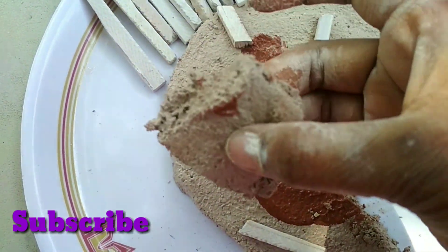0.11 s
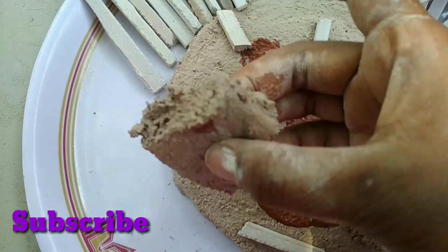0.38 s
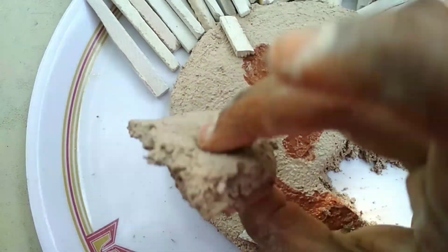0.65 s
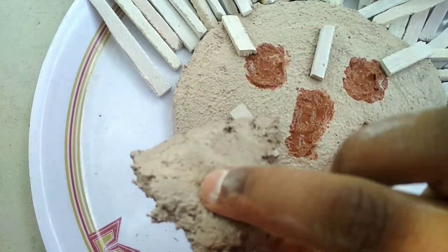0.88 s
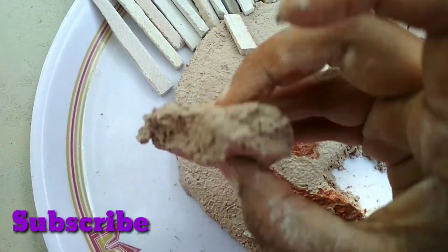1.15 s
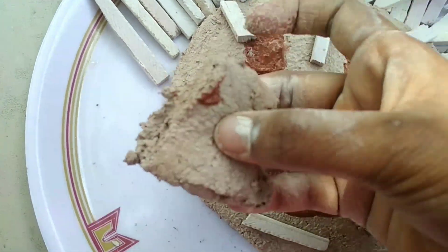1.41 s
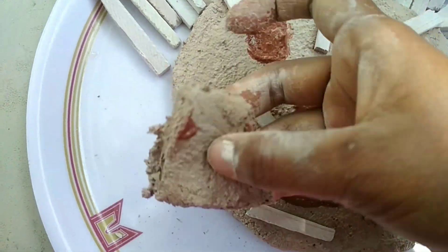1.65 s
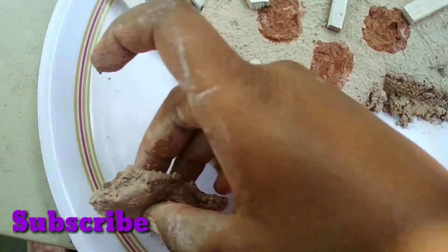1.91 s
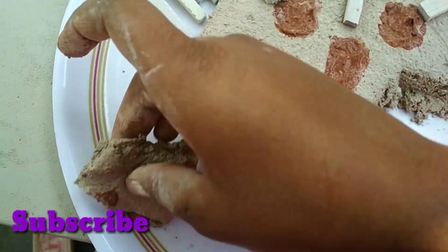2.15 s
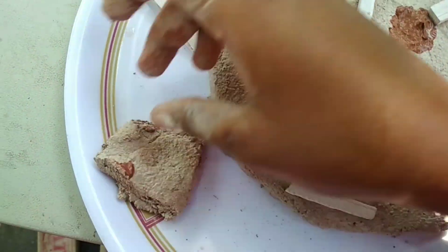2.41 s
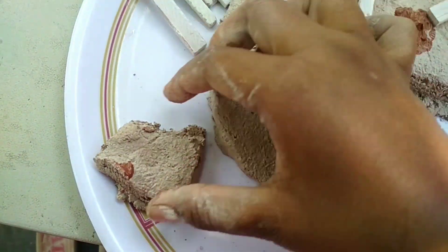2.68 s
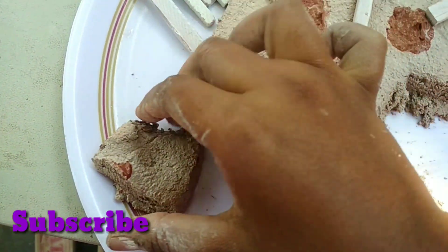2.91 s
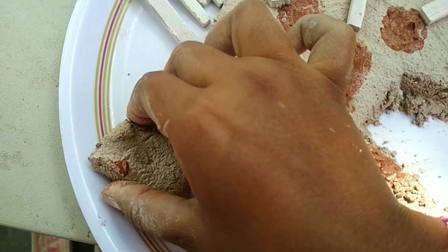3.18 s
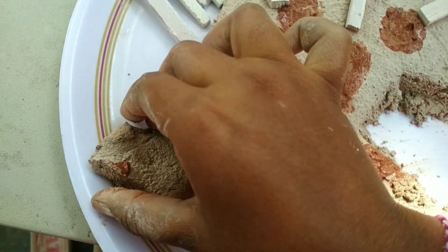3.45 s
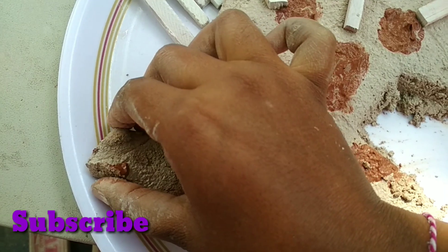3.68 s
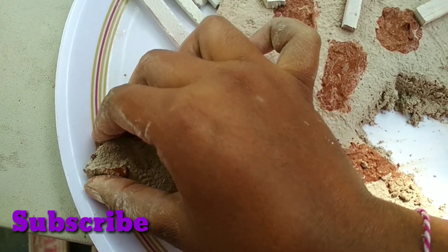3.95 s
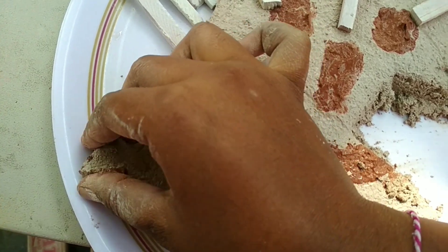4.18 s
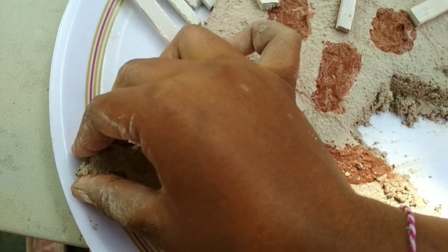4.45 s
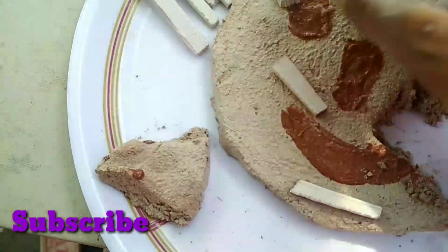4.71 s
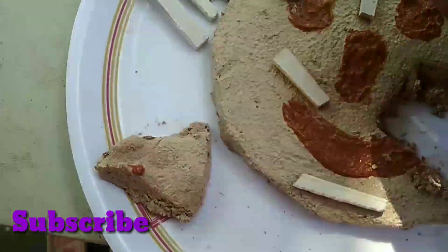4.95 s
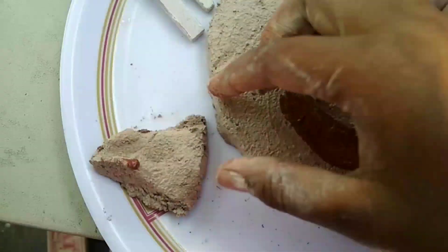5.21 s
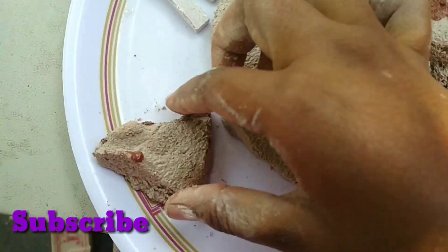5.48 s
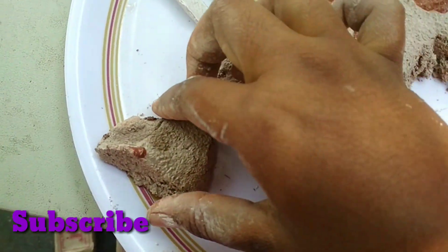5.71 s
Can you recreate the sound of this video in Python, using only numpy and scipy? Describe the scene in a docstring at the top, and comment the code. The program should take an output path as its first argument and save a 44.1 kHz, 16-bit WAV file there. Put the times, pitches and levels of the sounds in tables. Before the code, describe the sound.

A close stereo phone pickup in a quiet room with low rumble and faint smeared noise patches. Thin, wavering whines linger very faintly at the start, mostly gone by 0.6 s. Fingers rub a damp cake of pressed powder: a gritty squeeze at 0.3 s, a sharp bright snap with a crunch and small plate knock at 0.7 s, and another crackling squeeze around 1.2-1.3 s. A softer crunch comes at 2.1 s, then small crumb ticks until 2.4 s. Faint treble rubbing continues; one lump knocks the plastic plate at 3.1 s. From 3.8 to 4.6 s, tiny ticks lean left. A soft low nudge and dull drag at 4.9 s lead into the loudest moment: lumps clattering hollowly from 5.0 to 5.3 s, weakening until 5.6 s, with crackles, pattering debris and sliding powder. A faint tick and squeeze end it near 5.75 s.

```python
"""Fingers handle and crumble a damp cake of pressed powder over a plastic plate, close to a stereo phone.
From the start: low room rumble, faint smeared noise patches, whining tones (most gone within 0.6 s, one
faint low one lasting to 2 s), and grains rubbing as treble noise. From 0.2 s crumbs tick (noise bursts) and
squeezes crunch (duller noise). Single lumps ring the plate's modes at 0.7 and 3.1 s; a soft nudge at 4.9 s
leads into a run of lumps to 5.6 s, with pattering debris and sliding powder; a last faint squeeze ends it."""
import sys
import numpy as np
from scipy import signal
from scipy.fft import rfft, irfft
from scipy.io import wavfile

SR = 44100
rng = np.random.default_rng(int(sys.argv[2]) if len(sys.argv) > 2 else 0)


def store_pcm(level_fs):
    """Save levels as 16-bit WAV."""
    pcm = np.round(np.clip(level_fs, -1, 1) * 32767).astype(np.int16)
    wavfile.write(sys.argv[1], SR, np.atleast_2d(pcm).T)


N = 257879


def from_db(db):
    """Decibels to gain."""
    return 10 ** (np.asarray(db) / 20)


def rms_one(x):
    """Scale to unit rms."""
    return x / np.sqrt(np.mean(x ** 2) + 1e-20)


def noise_of(*shape):
    """White Gaussian noise."""
    return rng.standard_normal(shape)


def at_hz(points, hz):
    """Read a spectrum on a log-frequency axis."""
    point_hz, value = np.transpose(points)
    return np.interp(np.log(hz), np.log(point_hz), value)


def colour(x, spectrum):
    """Shape the last axis to a spectrum given in dB."""
    hz = np.maximum(np.arange(N // 2 + 1) * SR / N, 1)
    return irfft(rfft(x) * from_db(at_hz(spectrum, hz)), N)


def butter(x, order, edges_hz, kind):
    """Causal Butterworth filter."""
    return signal.sosfilt(signal.butter(order, edges_hz, kind, fs=SR, output="sos"), x)


def band(x, low_hz, high_hz):
    """Causal band-pass."""
    return butter(x + 1e-18, 2, [low_hz, min(high_hz, 0.45 * SR)], "band")


def in_time(rows):
    """Read a (t/s, value) curve at every sample."""
    return np.interp(np.arange(N) / SR, *np.transpose(rows))


def drift(rate_hz):
    """Random curve about 0: unit-normal knots, two per 1 / rate_hz, joined by straight lines."""
    return in_time(np.c_[np.arange(4000) / (2 * rate_hz), noise_of(4000)])


def sides(pan_db):
    """Left and right gains."""
    return from_db(np.array([pan_db / 2, -pan_db / 2]))


def dying(s, db, t60_s):
    """Envelope that jumps at every event and dies away exponentially."""
    env = np.zeros(N)
    for start_s, level_db, fall_s in zip(s, db, np.broadcast_to(t60_s, len(s))):
        i = round(start_s * SR)
        t = np.arange(min(N - i, int(abs(fall_s) * SR) + 9)) / SR
        env[i:i + len(t)] += from_db(level_db - 60 * t / abs(fall_s))
    return env


def swells(s, db, rise_s, fall_s, bend):
    """Climbs 20 dB in rise_s to each peak, drops 20 dB in fall_s; bend 1 = straight in dB, more = rounder."""
    t, env = np.arange(N) / SR, np.zeros(N)
    for peak_s, level_db, up_s, down_s in np.broadcast(s, db, np.abs(rise_s), np.abs(fall_s)):
        near = slice(max(int((peak_s - 4 * up_s) * SR), 0), int((peak_s + 4 * down_s) * SR))
        away = np.maximum((peak_s - t[near]) / up_s, (t[near] - peak_s) / down_s)
        env[near] += from_db(level_db - 20 * away ** bend)
    return env


def streaky(x, low_hz, high_hz, streak_db, rate_hz, count):
    """Split into narrow bands that each swell and sink on their own; unit rms."""
    edges = np.geomspace(low_hz, high_hz, count + 1)
    return rms_one(sum(band(x, a, b) * from_db(streak_db * drift(rate_hz)) for a, b in zip(edges, edges[1:])))


def uneven_grains(spread_db):
    """Noise with grains of uneven size, independent noise in each channel."""
    return noise_of(2, N) * from_db(spread_db * np.minimum(rng.exponential(1, N), 5))


# room noise spectrum, relative: f/Hz, level/dB
ROOM_SPECTRUM = [(12, -45.5), (20, -8), (85, 2), (238, -6), (388, -12), (649, -30), (985, -41.5),
                 (2560, -48.5), (3270, -42.5), (3980, -49), (7000, -52.5), (9100, -91), (15400, -120)]
# left-right likeness of the room noise: f/Hz, correlation [-1..1]
ROOM_LIKENESS = [(60, 0.82), (180, 0.86), (550, 0.54), (1650, -0.0), (4970, 0.0), (15000, 0.28)]


def rumble(patchy_db):
    """Quarter-octave bands of room noise, each with its own flicker and left-right likeness."""
    level_db = -61
    out, edges = 0, 20 * 2 ** np.arange(0, 9.1, 0.25)
    white = colour(noise_of(2, 2, N), ROOM_SPECTRUM)
    for k, (low_hz, high_hz) in enumerate(zip(edges, edges[1:])):
        mid, side = band(white[k % 2], low_hz, high_hz)
        alike = np.clip(at_hz(ROOM_LIKENESS, np.sqrt(low_hz * high_hz)), -1, 1)
        flicker_db = patchy_db * np.clip(np.log2(high_hz / 200), 0.3, 2.2) * drift(5)
        stereo = np.sqrt(1 + alike) * mid + np.sqrt(1 - alike) * side * [[1], [-1]]
        out = out + from_db(flicker_db) * stereo
    return from_db(level_db) * rms_one(out)


# faint smeared patches with no clear source: t/s, length/s, f/Hz, width/Hz, level/dB
SMEARS = [(.0, 0.32, 1420, 197, -73.5), (0.462, 0.3, 6770, 1200, -72.5), (0.993, 0.71, 1320, 278, -82),
          (1.748, 0.19, 6170, 730, -75), (1.787, 0.26, 4390, 1210, -71.5), (2.399, 0.28, 2280, 217, -71.5),
          (2.394, 0.25, 4410, 493, -77.5), (2.524, 0.23, 7970, 300, -67.5), (2.545, 0.23, 6900, 590, -68.5),
          (3.181, 0.25, 6600, 504, -68), (3.245, 0.2, 3350, 890, -75.5), (3.4, 0.47, 479, 29.6, -73),
          (3.772, 0.14, 873, 49.3, -72.5), (3.923, 0.15, 6350, 397, -76.5), (3.978, 0.18, 4430, 790, -72.5),
          (3.986, 0.38, 694, 80.4, -76), (4.077, 0.16, 1760, 202, -81.5), (2.597, 0.59, 1430, 615, -83),
          (0, .2, 2180, 496, -80.5), (4.306, 0.48, 1766, 143, -78), (5.734, 0.17, 6850, 700, -71)]


def patches():
    """Each patch is narrow noise that swells quickly and fades slowly."""
    out = np.zeros((2, N))
    for s, length_s, hz, width_hz, db in SMEARS:
        i, noise = max(round(s * SR), 0), noise_of(2, SR)
        n = min(int(length_s * SR), N - i, SR)
        env = np.interp(np.linspace(0, 1, n), [0, 0.2, 0.6, 1], [0.049, 0.99, 0.54, 0.049])
        narrow = band(noise, hz - width_hz / 2, hz + width_hz / 2)
        narrow = band(narrow, hz - width_hz, hz + width_hz)
        settled = rms_one(narrow)[:, SR - n:]
        out[:, i:i + n] += from_db(db) * env * settled * sides(-3.5)[:, None]
    return out


# whining tones: f/Hz, level/dB, start/s, end/s
WHINE_TONES = [(516, -84.5, 0.078, 2.02), (757, -75, 0.02, 0.29), (1516, -74.5, 0.016, 0.29),
               (2265, -86, 0, 0.26), (764, -74.5, 0.284, 0.49), (1530, -78, 0.266, 0.49),
               (1806, -87.5, 0.21, 0.574)]


def whine():
    """Thin rough tones that waver, break up and fade out."""
    t, out = np.arange(N) / SR, 0
    for hz, db, start_s, end_s in WHINE_TONES:
        phase = 2 * np.pi * hz * np.cumsum(1 + 0.0043 * drift(25)) / SR
        gain = from_db(db + 4.5 + 5.3 * drift(8.33) + 2.4 * drift(40))
        fade = np.clip(np.minimum((t - start_s + 0.046) / 0.028, (end_s - t) / 0.22), 0, 1)
        out = out + gain * np.sin(phase) * fade
    return out


# squeezes of the cake: t/s, grain level/dB, rise/s, fall/s, dull crunch re grain/dB
CAKE_SQUEEZES = [(0.222, -69, 0.0065, 0.076, -43), (0.303, -46.5, 0.035, 0.11, -12.5),
                 (0.682, -38.5, 0.0049, 0.12, -11.5), (0.793, -46.5, 0.011, 0.16, -12),
                 (1.18, -53, .02, 0.075, -11.5), (1.256, -40, 0.0097, 0.2, -19),
                 (2.058, -44, 0.0082, 0.14, -8.5), (4.83, -54, 0.091, 0.26, -10),
                 (5.753, -68.5, 0.014, 0.19, -40)]
# rounder swells of grain hiss without crunch, light touches and the held parts of squeezes:
# t/s, grain level/dB, half length/s
ROUND_SWELLS = [(0.0, -75, 0.13), (0.132, -75.5, 0.073), (.58, -64, 0.25), (0.66, -70, 0.07),
                (0.902, -52, 0.15), (1.148, -63, 0.017), (1.249, -68, 0.07), (1.324, -46.5, 0.057),
                (1.547, -75.5, 0.23), (1.702, -60, 0.092), (1.892, -61.5, 0.097), (2.001, -56, 0.092),
                (2.234, -58.5, 0.1), (2.346, -60, 0.17), (2.636, -59, 0.084), (2.799, -64, 0.083),
                (3.007, -96, 0.023), (3.083, -64, 0.044), (3.22, -65.5, 0.2), (3.357, -62, 0.053),
                (3.524, -71.5, 0.029), (3.642, -63.5, 0.059), (3.782, -67.5, 0.029), (3.849, -70, 0.034),
                (3.975, -72.5, 0.017), (4.068, -62.5, 0.039), (4.192, -69, 0.034), (4.273, -66, 0.04),
                (4.424, -70, 0.012), (4.543, -67, 0.6), (4.631, -58, 0.017), (5.003, -92, 0.047),
                (5.177, -50.5, 0.057), (5.353, -62.5, 0.23), (5.576, -80, 0.14)]
SQUEEZE_BEND = 1.11


def grip():
    """Drive of the grain hiss in dB: squeezes and rounder swells over the resting hand."""
    rest_db, round_bend = -99.5, 1.32
    s, db, rise_s, fall_s, _ = np.transpose(CAKE_SQUEEZES)
    round_s, round_db, half_s = np.transpose(ROUND_SWELLS)
    squeezes = swells(s, db, rise_s, fall_s, SQUEEZE_BEND)
    rounder = swells(round_s, round_db, half_s, half_s, round_bend)
    return 20 * np.log10(from_db(rest_db) + squeezes + rounder)


# spectrum of the strong hiss, relative: f/Hz, level/dB
GRAIN_SPECTRUM = [(3530, -43), (6000, -22.5), (7540, -29), (7970, -19.5), (9840, -8.5), (11700, -3),
                  (14800, -6.5), (15900, 2.5), (16500, -77.5)]
# where the fingers work: t/s, left-right level/dB
HAND_PAN = [(0.0, -14), (0.29, 1), (2.51, -0.5), (3.84, -18), (4.92, 6.5), (5.85, -3.5)]


def rubbing(spread_db, clump_db):
    """Dense grains of uneven size come in clumps; each microphone hears a different mix of them."""
    hiss_db = grip()
    effort = np.clip((hiss_db + 77.5) / 30, 0, 1)      # strong hiss is lumpier than faint hiss
    strong = colour(uneven_grains(spread_db), GRAIN_SPECTRUM)
    strong = streaky(strong, 5000, 16500, streak_db=2.5, rate_hz=8.6, count=30)
    clumps = from_db(clump_db * effort * drift(120) + 0.4 * drift(23))
    faint = colour(noise_of(2, N), [(9000, 0.00099), (16000, 0.5)])
    faint = rms_one(butter(faint, 5, [9670, 15400], "band"))      # thin and even
    grains = effort * strong + (1 - effort) * faint
    return from_db(hiss_db + 3.0) * grains * clumps * sides(in_time(HAND_PAN))


# crumbs snapping: t/s, level/dB, left-right level/dB
CRUMB_TICKS = [(0.2215, -54, -34), (0.6852, -20, 7), (1.178, -40, 7), (1.25, -24.5, 2.5), (1.281, -27, -8),
               (2.2232, -35, -4), (2.3125, -39, -17), (2.3504, -39, -13), (2.38, -37.5, -13.5),
               (3.7845, -60.5, -29), (3.9652, -50, -31), (4.1842, -53, -7), (4.1976, -47, -30),
               (4.2335, -35, 4), (4.327, -49.5, -30), (4.4003, -58, -13), (4.4109, -47, -14),
               (4.4284, -36.5, -22), (4.5101, -45, -18.5), (4.5247, -44, -29), (4.6097, -48, -26),
               (4.636, -56, -19), (4.6406, -48, -22), (5.2461, -38, -1), (5.5247, -35.5, -4),
               (5.7453, -40.5, -5)]


def ticks():
    """A crumb snaps: a few milliseconds of bright noise."""
    s, db, pan_db = np.transpose(CRUMB_TICKS)
    env = np.array([dying(s, db + side * pan_db / 2 + 3, 0.0065) for side in (1, -1)])
    bright = band(band(env * noise_of(2, N), 10580, 13000), 7500, 17000)
    dull = band(env * noise_of(2, N), 3000, 7300)
    return bright + from_db(-32) * dull


# spectrum of the yielding mass, relative: f/Hz, level/dB
MASS_SPECTRUM = [(290, -44), (500, -0.5), (969, -5.5), (1250, -7), (2690, -11.5), (4080, -17.5),
                 (8000, -14.5), (10400, -49.5), (17600, -120)]


def crunches(clump_db):
    """The damp mass yields to each squeeze with a dull grainy noise, and slides on, duller, after each lump."""
    lag_s, extra_rise_s, stretch = 0.014, 0.014, 1.087      # the mass yields after the skin grips
    slide_db, slide_follows, slide_t60_s = -65, 0.66, 0.38
    yield_tilt_db, slide_tilt_db = 3, -7      # per octave from 1 to 8 kHz
    grains = colour(uneven_grains(2.3), MASS_SPECTRUM)
    grains = streaky(grains, 398, 8960, streak_db=2.5, rate_hz=10, count=32)
    s, db, rise_s, fall_s, crunch_db = np.transpose(CAKE_SQUEEZES)
    yielding = swells(s + lag_s, db + crunch_db, rise_s + extra_rise_s, stretch * fall_s, SQUEEZE_BEND)
    lump_s, lump_db = np.transpose(LUMP_KNOCKS)[:2]
    sliding = dying(lump_s, slide_db + slide_follows * (lump_db + 28), slide_t60_s)
    out = 0
    for env, tilt_db in ((yielding, yield_tilt_db), (sliding, slide_tilt_db)):
        out = out + env * rms_one(colour(grains, [(1000, 0), (8000, np.log2(8) * tilt_db)]))
    return out * from_db(clump_db * drift(60))


# lumps on the plate: t/s, level/dB, thump re level/dB, crack re level/dB, sparkle re level/dB
LUMP_KNOCKS = [(0.68, -37, -20.5, -49, 1), (3.08, -31.5, -9, -3.5, -4.5), (3.089, -34, -3, -27.5, -38),
               (4.897, -45.5, -8, -18, -17), (4.992, -16.5, -15, -16, -19), (5.003, -23.5, -12, -43, -49.5),
               (5.079, -23, -14, -7.5, -8), (5.129, -31.5, -2.5, -1, -7.5), (5.16, -16, -15, -9.5, -1.5),
               (5.175, -27, -5.5, -9.5, -23.5), (5.222, -28, -25, -26, -22), (5.28, -19.5, -19, -12.5, -17),
               (5.286, -21.5, -12, -6.5, -13.5), (5.393, -26.5, -17.5, -22, -27),
               (5.439, -43, -6.5, -13.5, -38), (5.467, -47, -4, -20, -42), (5.5, -47, -15, -26, -38),
               (5.516, -55, -14, -32.5, -38), (5.549, -44.5, -16, -39, -44), (5.59, -49.5, -3, -49, -41)]
# plate modes: f/Hz, level/dB, t60/s
PLATE_MODES = [(241, -13.5, 0.071), (294, -9.5, 0.19), (361.3, -1.5, 0.088), (412, -5, 0.077),
               (462, -10.5, 0.022), (499.5, -10.5, 0.076), (659, -9.5, 0.031), (839, -11.5, 0.046),
               (926, -7, 0.054), (984, -11.5, 0.025), (1090, -11.5, .05), (1200, -9, 0.034),
               (1537, -2.5, 0.021), (2012, -5.5, 0.038), (2780, -11, 0.064), (3210, -22.5, 0.054),
               (4000, -14.5, 0.01)]


def knocks():
    """Lumps ring the plate's modes and crack; the treble of each knock dips near 5.6 kHz and arrives later,
    weaker at left."""
    lag_s, side_db = 0.00021, -5
    crumbs_per_s, crumbs_db, crumbs_t60_s = 150, -30, 0.37      # fine debris patters after each lump
    s, db, thump_db, crack_db, sparkle_db = np.transpose(LUMP_KNOCKS)
    at, low, top = np.round(s * SR).astype(int), np.zeros((2, N)), np.zeros((2, N))
    patter = dying(s, db + crumbs_db, crumbs_t60_s) * (rng.random(N) < crumbs_per_s / SR)
    for hz, mode_db, t60_s in PLATE_MODES:
        high = np.clip(np.log2(hz / 500), 0, 1)      # low modes follow the thump and reach both sides alike
        upper = np.clip(np.log2(hz / 1300), 0, 1)
        strength_db = db + mode_db - 7.5 + (1 - high) * (thump_db + 7.5) + upper * (crack_db + 8)
        strength_db = strength_db + rng.normal(0, 1.0, len(s))
        clicks = patter * noise_of(N) * from_db(mode_db - 9.5 * upper)
        clicks[at] = from_db(strength_db) * rng.choice([-1, 1], len(s))
        r, w = from_db(-60 / (t60_s * SR)), 2 * np.pi * hz / SR
        ring = signal.lfilter([0, np.sin(w)], [1, -2 * r * np.cos(w), r * r], clicks + 1e-18)
        ring = band(ring, hz / 2, hz * 2)      # a soft lump: the ring builds over a cycle
        ring = ring * sides(side_db * high)[:, None]
        low, top = low + (1 - upper) * ring, top + upper * ring
    noise = 0.29 * noise_of(N) + 0.61 * noise_of(2, N)
    crack = (crack_db + 14.5, 900, 4500, 0.02, 0.15)
    sparkle = (sparkle_db + 8.5, 7200, 15500, 0.015, 0.1)
    for rel_db, low_hz, high_hz, t60_s, tail_s in (crack, sparkle):
        env = dying(s, db + rel_db, t60_s)
        env = env + dying(s, db + rel_db - 24.5, tail_s)      # loose crumbs after the break
        top += band(band(env * noise, low_hz, high_hz), low_hz, high_hz) * sides(side_db)[:, None]
    low += band(dying(s, db + thump_db + 10, 0.044) * noise, 90, 610)      # the table under the plate thuds
    top = butter(top, 2, [5100, 6200], "bandstop")
    top[0] = np.roll(top[0], round(lag_s * SR))
    return low + top


def room(x):
    """Diffuse tail: convolution with decaying noise, different in each channel."""
    t60_s, onset_s = 0.3, 0.0066
    t = np.arange(SR // 2) / SR
    tail = noise_of(2, len(t)) * from_db(-60 * t / t60_s) * np.minimum(t / onset_s, 1)
    tail = band(tail, 170, 11000)
    return signal.fftconvolve(x, tail / np.sqrt(np.sum(tail[0] ** 2)), axes=1)[:, :N]


def nudge():
    """The hand nudges the plate: one soft low push through the table, then a short dull drag."""
    at_s, level_db, drag_t60_s = 4.870, -38, 0.37
    push = band(dying([at_s], [level_db + 11], 0.037), 73, 340)
    drag = signal.lfilter([0.01], [1, -0.99], dying([at_s], [level_db - 8], drag_t60_s))
    return push + drag * rms_one(band(band(noise_of(N), 89, 310), 60, 660))


def scene():
    """Hand, plate and room together."""
    room_wet_db = -18.5
    plate = knocks()
    hand = rubbing(spread_db=3.5, clump_db=1.9) + ticks() + crunches(clump_db=1.5) + nudge()
    background = rumble(patchy_db=3.5) + patches() + whine()
    return background + hand + plate + from_db(room_wet_db) * room(plate)


def roll_off(x):
    """The treble ends steeply here."""
    return signal.sosfilt(signal.butter(12, 16640, fs=SR, output="sos"), x)


def record(dry):
    """Cut the top above 16 kHz with a steep low-pass."""
    mix = signal.sosfilt(signal.cheby2(8, 40, 16300, fs=SR, output="sos"), dry)
    return roll_off(mix)


dry = scene()
out = record(dry)
store_pcm(out)
```